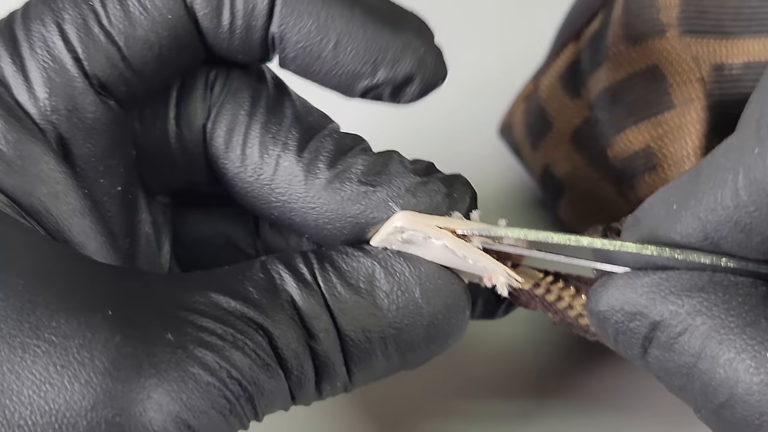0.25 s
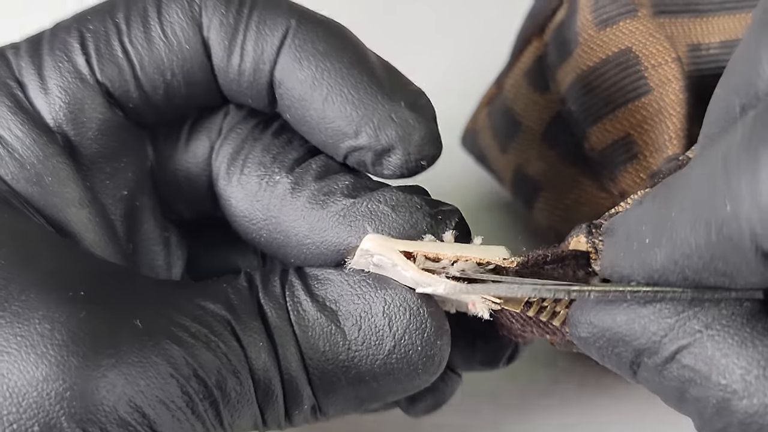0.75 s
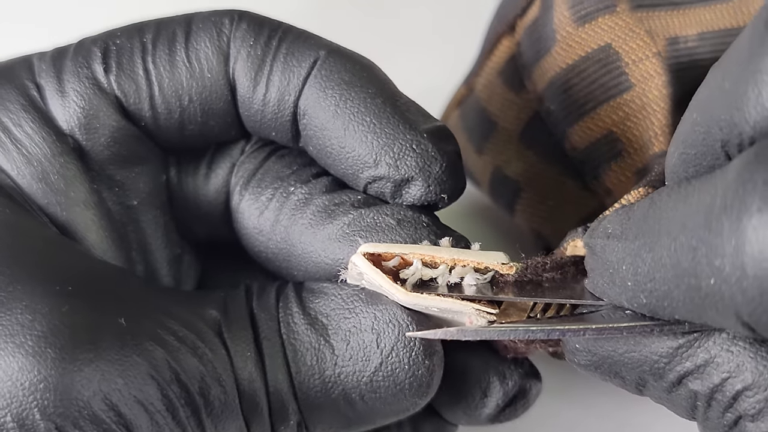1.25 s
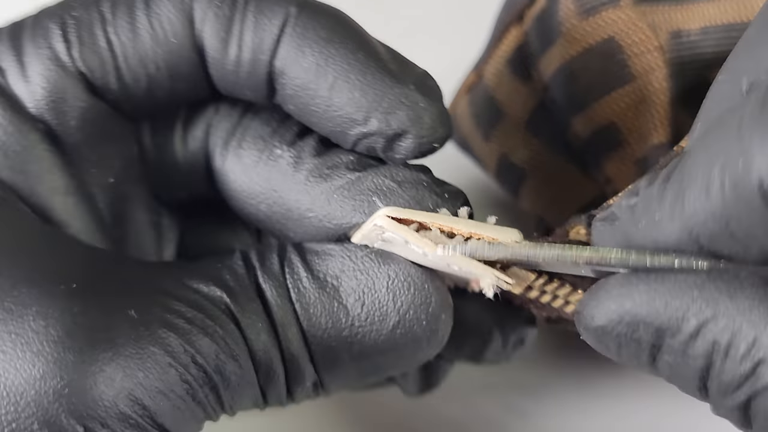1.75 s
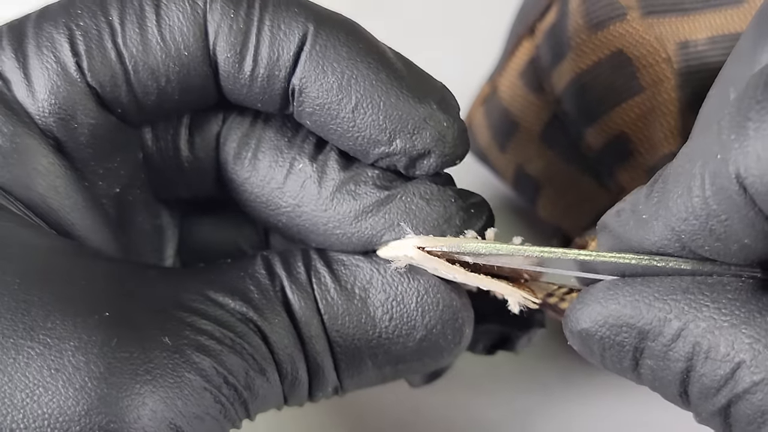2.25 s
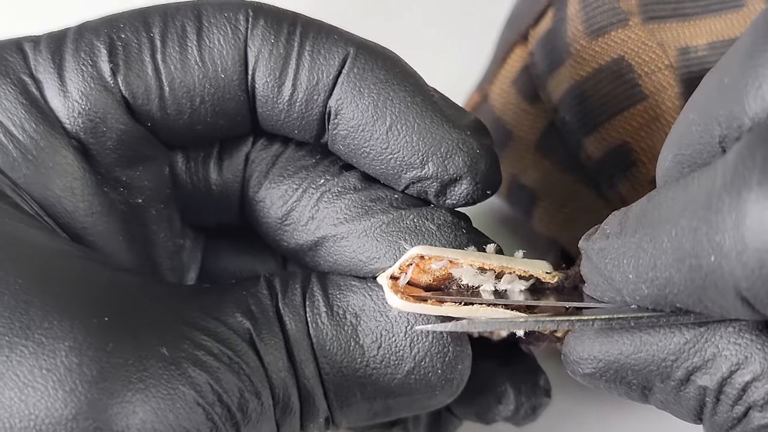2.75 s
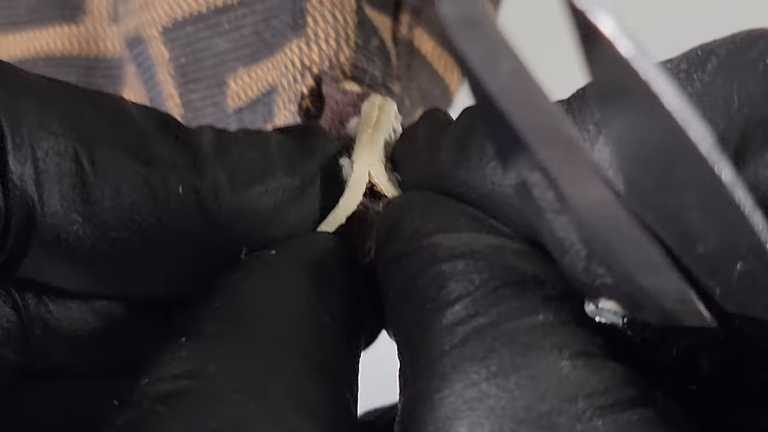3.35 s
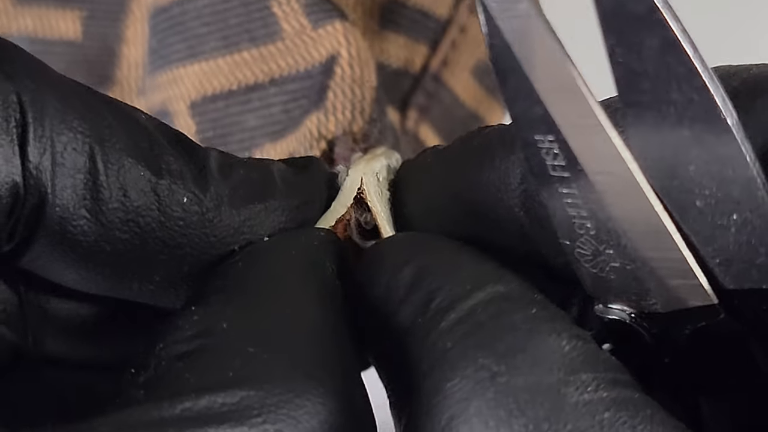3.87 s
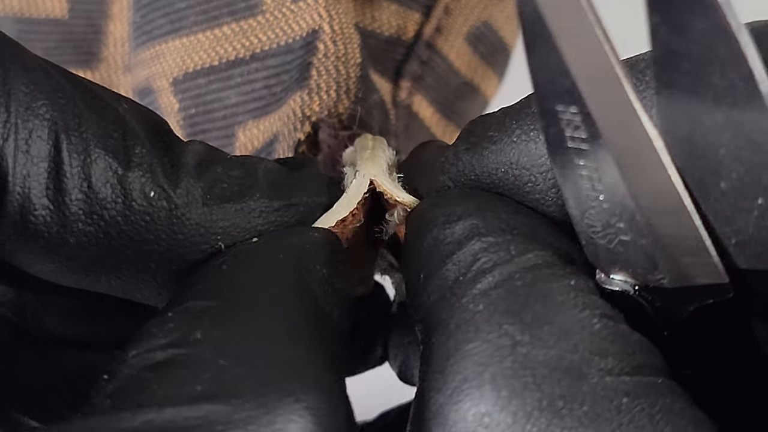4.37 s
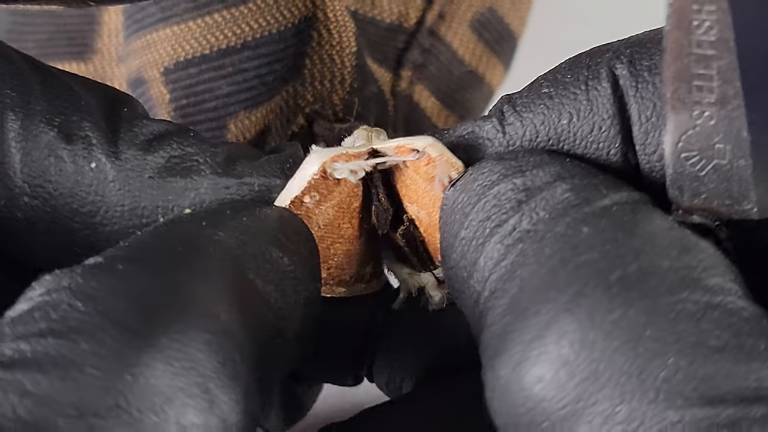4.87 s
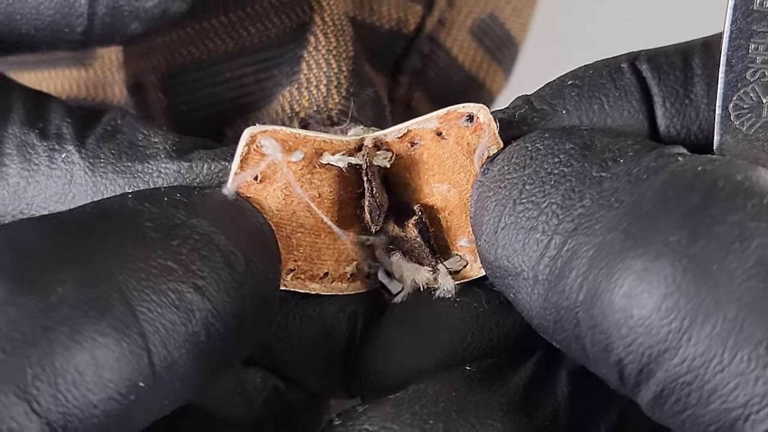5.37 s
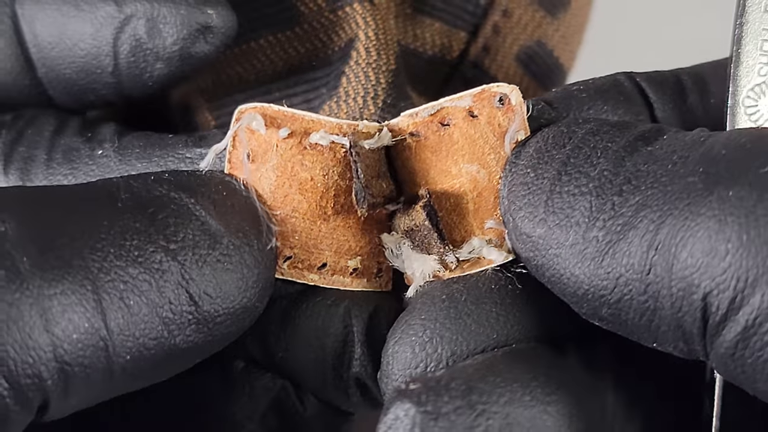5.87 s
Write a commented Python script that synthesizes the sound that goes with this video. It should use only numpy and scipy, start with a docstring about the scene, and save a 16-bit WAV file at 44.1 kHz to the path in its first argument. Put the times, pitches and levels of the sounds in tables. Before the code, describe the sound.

Delicate cutting of thread in leather: tiny dry ticks, short steel rasps and soft glove brushing, with snaps growing harder near the middle. Afterwards rubber fingertips drag and tap, a stiff piece pops open, and torn fibres crackle in quick clusters. A squeaky-gritty glove slide ends in a big low bump, followed by low shaking. Recorded very close, with a short room tail and quiet ventilation rumble.

```python
"""Small scissors cut the stitching of a leather tab, close to a two-port microphone: each snap is a
sharp release that rings damped steel and leather, between rasps of grainy filtered slips.
Gloved hands brush, rub and tap in shaped noise and short knocks; as the tab opens it pops, then its
fibres snap, crackle and strain. Bumps ring the microphone's holder in decaying sines; a hand jolts it late on.
Rumble, hiss and a faint hum lie behind; cuts and friction leave a short diffuse room tail."""
import sys
import numpy as np
from scipy import signal
from scipy.fft import rfft, irfft
from scipy.io import wavfile

SR = 44100
rng = np.random.default_rng(int(sys.argv[2]) if len(sys.argv) > 2 else 0)


def materialize(psi):
    """Save the field psi as 16-bit PCM at rate SR to the path in sys.argv[1].

    A 1-D psi becomes a single channel; in a 2-D psi each row is a channel.
    """
    bounded = np.clip(np.atleast_2d(psi).T, -1, 1)
    quanta = np.round(bounded * 32767).astype(np.int16)
    wavfile.write(sys.argv[1], SR, quanta)


N = 269871

# All levels in dB are relative: most layers add a trim of their own.
# Difference between the ports; the right one faces the blades.
# Each row: frequency in Hz, left over right in dB.
PORT_BALANCE = [(300, -8.5), (2800, -7.5), (5000, -5), (6500, -3), (8300, -17.5), (10000, -19.5),
                (12500, -3.5), (14500, -1)]

# Spectrum of the air noise. Each row: frequency in Hz, density in dB per Hz.
AIR_SPECTRUM = [(15, -73), (25, -24), (64, -11), (123, -9.5), (149, -12.5), (185, -11.5), (212, -27),
                (255, -13.5), (390, -35.5), (460, -28), (560, -35), (1040, -34.5), (1400, -40.5),
                (3620, -43), (16000, -55.5)]
# Likeness of the air noise in the two ports. Each row: frequency in Hz, likeness from -1 to 1.
AIR_LIKENESS = [(50, 1), (130, 1), (400, 0.65), (1500, 0.424), (5000, 0.034)]
# Steady hum tones. Each row: frequency in Hz, level in dB.
HUM_TONES = [(80.7, -59.5), (118.4, -57.5), (177.6, -60)]
# The background dips briefly. Each row: time in seconds, level in dB.
BACKGROUND_DIP = [(2.36, -10.5), (2.45, -26.5), (2.52, -33.5), (2.66, -25), (2.75, -11)]

# Soft brushing of gloves, leather and cloth, and one light blade scrape at 1.26 seconds.
# Each row: peak in seconds, level in dB, rise in seconds, fade in seconds, left over right in dB.
BRUSH_STROKES = [(0.008, -73, 0.078, 0.108, 1.5), (0.3, -82.5, 0.142, 0.283, 2),
                 (1.264, -77.5, 0.035, 0.091, -2.5), (1.78, -78, 0.144, 0.15, -3.5),
                 (1.868, -78, 0.058, 0.093, -5.5), (3.118, -77, 0.149, 0.31, 0),
                 (3.49, -84, 0.42, 0.22, 2.5), (3.607, -72, 0.069, 0.101, 1.5), (3.8, -78, 0.19, 0.138, -2),
                 (5.2, -84.5, 1, 0.93, 2), (6.081, -80, 0.5, 0.215, 4)]
# Soft and hard-pressed brushing spectra. Each row: frequency in Hz, density in dB per Hz.
SOFT_BRUSH_SPECTRUM = [(900, 3.5), (2000, 1), (2700, -3), (4000, 0), (5200, 1), (7000, -6), (10000, -39),
                       (15000, -12.5)]
HARD_BRUSH_SPECTRUM = [(2000, -40.5), (4500, -24), (6300, -1), (8500, 0.5), (11000, -2.5), (15000, -41.5)]

# Firmness of the grip, light while cutting and firm while pulling the tab open.
# Each row: time in seconds, level in dB.
GRIP_FIRMNESS = [(0, -58), (0.8, -59), (1.9, -55.5), (2.9, -61.5), (3.5, -53.5), (4.2, -56), (5.0, -48.5),
                 (6.12, -58)]
# Rubber fingertips dragging on the leather.
# Each row: peak in seconds, level in dB, rise in seconds, fade in seconds.
RUB_STROKES = [(1.85, -65.5, 0.081, 0.076), (2.1, -72.5, 0.25, 0.5), (3.15, -69.5, 0.195, 0.293),
               (3.54, -64.5, 0.134, 0.157), (3.88, -70.5, 0.35, 0.77), (4.1, -64, 0.151, 0.06),
               (4.24, -62, 0.234, 1), (4.46, -62, 0.108, 0.05), (4.76, -70, 0.118, 0.38),
               (5.965, -64, 0.068, 0.067), (6.035, -62.5, 0.039, 0.26)]
# A glove sliding over the opened tab, close to the microphone.
# Each row: peak in seconds, level in dB, rise in seconds, fade in seconds.
SLIDE_STROKES = [(5.56, -62, 0.135, 0.192), (5.73, -57.5, 0.093, 0.146), (5.816, -54.5, 0.0125, 0.0797),
                 (5.848, -58, 0.061, 0.0434)]
# Spectra of the grip, the rub, and the slide at each port.
# Each row: frequency in Hz, density in dB per Hz.
GRIP_SPECTRUM = [(20, -16.5), (45, -6), (70, 5), (120, -2), (200, -9.5), (350, -22), (700, -53.5),
                 (3000, -54.5)]
RUB_SPECTRUM = [(120, 0), (310, 8), (490, 2.5), (800, -5), (1000, -5), (1170, -7.5), (1400, -6.5),
                (1800, -15), (3600, -22), (4400, -25), (14000, -45)]
LEFT_SLIDE_SPECTRUM = [(200, 11.5), (1000, -3), (1800, -1), (2150, -12.5), (2550, -13), (3600, -7.5),
                       (4300, -20), (5200, -14.5), (8000, -28), (11000, -29), (16000, -27.5)]
RIGHT_SLIDE_SPECTRUM = [(250, 14), (1000, -6), (1170, -8), (1400, -5), (2550, -19), (3000, -7.5),
                        (4400, -18), (11000, -22.5), (16000, -31.5)]

# Hand knocks that reach the microphone. Each row: start in seconds, level in dB.
HAND_BUMPS = [(0.234, -48.5), (2.536, -59), (3.094, -41.5), (3.212, -48), (3.373, -50.5), (3.454, -44),
              (3.783, -47), (4.334, -41.5), (4.573, -39), (4.746, -43), (4.834, -40.5), (4.922, -44.5),
              (5.047, -39.5), (5.087, -43.5), (5.203, -43), (5.301, -42.5), (5.815, -25), (6.024, -38.5)]
# Modes of the microphone's holder.
# Each row: frequency in Hz, level in dB, swelling time in seconds, right port as a factor on the left.
HOLDER_MODES = [(62.96, -6.5, 0.00856, -1.95), (127.36, 0, 0.00515, -0.028), (180.9, -7.5, 0.00516, -0.5),
                (236.3, -15.5, 0.00567, 0.5), (476.3, -33.5, 0.0062, -0.38)]

# Strokes of the blade along the seam.
# Each row: peak in seconds, level in dB, rise in seconds, fade in seconds.
SCRAPE_STROKES = [(0.73, -77.5, 0.073, 0.35), (0.875, -66.5, 0.0636, 0.087), (0.97, -78.5, 0.057, 0.45),
                  (1.862, -64, 0.05, 0.067), (2.062, -72, 0.029, 0.118), (2.207, -69.5, 0.011, 0.031),
                  (3.1, -70, 0.069, 0.031), (3.147, -72.5, 0.018, .015), (3.212, -75.5, 0.025, 0.051),
                  (3.622, -68.5, 0.029, 0.044), (4.47, -68.5, 0.05, 0.0615)]
# Scrape spectrum. Each row: frequency in Hz, density in dB per Hz.
SCRAPE_SPECTRUM = [(1500, -25.5), (2800, 1.5), (4500, -2), (6000, 1.5), (7200, 0.5), (9000, -7),
                   (11000, -4.5), (12200, -25.5), (16000, -11.5)]

# One row a snap: cut threads at first, sharp fibre crackles once the tab tears.
# Each row: start in seconds, sharp snap in dB, bright ring in dB, bright ring in Hz,
# dull crunch in dB, lowest leather ring in Hz.
SNAP_EVENTS = [(0.7044, -55, -71, 9000, -88.5, 2520), (0.7674, -60, -59.5, 6930, -89, 2500),
               (0.8617, -53, -41, 9200, -64, 2900), (0.867, -64, -41, 9100, -61.5, 2940),
               (1.2535, -54, -41.5, 5290, -57.5, 2340), (1.257, -57.5, -53.5, 6800, -63, 1780),
               (1.6624, -56, -67.5, 10100, -67, 1460), (1.8327, -49, -46, 5070, -63, 2500),
               (2.5364, -33.5, -37.5, 10220, -50.5, 2370), (3.1062, -36.5, -30, 8570, -39.5, 2570),
               (4.0503, -61, -50, 6220, -91.5, 2500), (4.432, -52, -45, 8210, -67.5, 2500),
               (4.565, -24, -21, 9785, -55.5, 2440), (4.7846, -45.5, -49.5, 9700, -67, 2080),
               (4.829, -46, -44.5, 11100, -72, 2000), (4.916, -49, -52, 9400, -82, 2005),
               (4.9477, -52.5, -46, 9500, -81, 2000), (4.998, -47.5, -47, 9200, -80.5, 2000),
               (5.039, -38.5, -37.5, 9970, -81.5, 2000), (5.0517, -48.5, -44.5, 7600, -83.5, 2000),
               (5.3027, -41, -43, 11200, -81, 2000), (5.622, -65.5, -66.5, 12800, -86, 2000),
               (5.6946, -48, -59.5, 12300, -80.5, 2000), (5.8061, -39, -52, 13000, -71.5, 2000),
               (5.985, -53, -61.5, 11600, -79, 2000)]
# The stiff leather's rings. Each row: multiple of its lowest, width in Hz, level in dB.
LEATHER_RINGS = [(1, 640, -2), (1.18, 800, 0), (1.35, 647, -6)]
# Spectra of the sharp snap and dull crunch. Each row: frequency in Hz, density in dB per Hz.
SNAP_SPECTRUM = [(300, 4.5), (1300, -5.5), (3000, -16), (5200, -0.5), (6300, 2.5), (7400, -6), (9800, 1.5),
                 (11000, 8), (12500, 3), (15500, -1)]
CRUNCH_SPECTRUM = [(150, 0.5), (480, -9.5), (740, 14.5), (1200, -23.5), (1700, 4.5), (2050, -32),
                   (2450, 9.5), (3350, 4.5), (3900, -16), (5300, -11.5), (8000, -23), (15000, -60.5)]

# The pressed blade, and later the stretched glove, sing in a narrow, sliding band.
# Each row: peak in seconds, level in dB, rise in seconds, fade in seconds, frequency at the peak in Hz,
# glide in octaves per second, left over right in dB.
RASP_STROKES = [(0.955, -76, 0.117, 0.117, 8070, 1.5, -15), (1.78, -75.5, 0.096, .18, 5170, 3.5, 1.5),
                (1.872, -69, 0.056, 0.071, 6230, -2, 5), (3.085, -76.5, 0.067, 0.058, 5650, 6.5, -3.5),
                (3.208, -75.5, 0.039, 0.035, 8700, 0, -11.5), (3.48, -77.5, 0.085, 0.31, 3750, 7.5, 8),
                (3.577, -65, 0.081, 0.049, 4320, 0, 4.5), (3.612, -65, 0.053, 0.04, 5560, 8, 13),
                (5.655, -76, 0.063, .1, 13860, 0.94, 2), (5.72, -72.5, 0.048, 0.3, 11150, 0.13, -0.5)]

# Soft taps of glove and scissors on the leather. Each row: start in seconds, pat in dB,
# hollow knock in dB, knock in Hz, port angle in degrees (0 left, 90 right, 135 opposed).
LEATHER_TAPS = [(1.253, -54, -50, 612, 56.5), (1.971, -48.5, -57, 600, 67), (3.104, -49.5, -51, 830, 84),
                (3.122, -56, -42.5, 271, 62), (4.108, -59, -31.5, 209.3, 107.5),
                (4.176, -61.5, -33.5, 158.6, 107.3), (4.203, -49, -40, 235, 48),
                (4.221, -49.5, -35.5, 376, 117), (4.289, -59.5, -39, 499, 98),
                (4.304, -46, -32.5, 510, 139.5), (4.442, -52, -38, 283, 92.5),
                (4.481, -39.5, -38, 372, 104), (4.566, -52, -26, 148, 121.3),
                (4.956, -52.5, -36, 237.4, 24.4), (5.27, -53.5, -39.5, 197, 42),
                (5.517, -43, -41.5, 291, 86), (5.812, -31.5, -17.5, 141, 156.4),
                (5.978, -47, -29, 164.6, 5.1), (6.017, -44, -31.5, 219, 104.8),
                (6.049, -43, -41, 293, 14.8)]
# Pat spectrum. Each row: frequency in Hz, density in dB per Hz.
PAT_SPECTRUM = [(100, 6), (300, 13), (450, 1.5), (680, -2), (950, -6), (1400, -12.5), (2200, -22),
                (3300, -38.5), (6000, -29.5), (12000, -39)]

# Spectrum of the tab's pop. Each row: frequency in Hz, density in dB per Hz.
POP_SPECTRUM = [(300, -31), (800, -6), (1250, 2.5), (1650, -6), (2300, -41.5), (8000, -17.5)]

# Pulls that tear fibres as the tab opens.
# Each row: peak in seconds, level in dB, rise in seconds, fade in seconds.
TEAR_STROKES = [(4.786, -51.5, 0.0063, 0.016), (4.806, -60, 0.046, 0.0574), (4.832, -51, 0.026, 0.0452),
                (4.948, -56.5, 0.048, .045), (5.033, -62.5, 0.074, 0.089), (5.17, -78.5, 0.23, 0.52),
                (5.425, -76, 0.066, 0.45), (5.712, -67, 0.096, 0.126), (5.817, -74.5, 0.022, 0.045)]
# Tearing spectrum. Each row: frequency in Hz, density in dB per Hz.
TEAR_SPECTRUM = [(2000, -32), (4200, -29.5), (5000, -2.5), (5700, -25), (6400, -15), (7200, -12),
                 (8300, -4.5), (9500, -1.5), (10400, -5), (12700, -6), (13800, -11), (15500, -18)]

# Fibres creep with each small tug while the tab is held taut.
# Each row: peak in seconds, level in dB, rise in seconds, fade in seconds.
STRAIN_STROKES = [(5.07, -75.5, 0.155, 0.145), (5.205, -77, 0.1, 0.176), (5.5, -80.5, 0.335, 0.32)]
# Bands that the creeping fibres ring. Each row: frequency in Hz, width in Hz, level in dB.
STRAIN_RINGS = [(5106, 550, 0), (6380, 940, 1), (9500, 600, -3.5)]

# A hand jolts the microphone. The one row: start in seconds, length in seconds, level in dB,
# frequency in Hz, right port as a factor on the left.
HAND_JOLT = (6, 0.47, -22.5, 63, -1.54)

# Spectrum of the room tail. Each row: frequency in Hz, density in dB per Hz.
ROOM_SPECTRUM = [(200, -10), (700, 6), (1500, 0), (3000, 0), (6000, 1.5), (10000, -1), (13000, -7),
                 (16000, -20)]


def gain_of(db):
    """Decibels to amplitude."""
    return 10 ** (np.asarray(db) / 20)


def port_gains(left_over_right_db):
    """Left and right gains that share a level difference equally."""
    return gain_of(np.array([[.5], [-.5]]) * left_over_right_db)


def evened(x):
    """Scales to rms 1."""
    return x / np.sqrt(np.mean(x ** 2) + 1e-20)


def read(points, hz):
    """Reads a spectrum on a log-frequency axis."""
    f, value = np.transpose(points)
    return np.interp(np.log(hz + 1), np.log(f + 1), value)


def level(points):
    """Amplitude over time from a curve of (seconds, dB)."""
    return gain_of(np.interp(np.arange(N) / SR, *np.transpose(points)))


def add(mix, s, sound):
    """Mixes a sound in at time s."""
    part = mix[..., max(round(s * SR), 0):][..., :sound.shape[-1]]
    part += sound[..., :part.shape[-1]]


def colour(x, spectrum, facing=0, size=4096):
    """Minimum-phase filter to both ports, mean energy 1; facing scales the port balance."""
    hz = np.fft.rfftfreq(size, 1 / SR)
    log_gain = np.log(gain_of(read(spectrum, hz)) * port_gains(facing * read(PORT_BALANCE, hz)))
    circle = np.concatenate([log_gain, log_gain[:, -2:0:-1]], axis=1)
    # the Hilbert transform of the log gain gives the phase that makes the filter causal
    impulse = np.fft.ifft(np.exp(np.conj(signal.hilbert(circle)))).real
    return signal.oaconvolve(x * np.ones((2, 1)), evened(impulse) / np.sqrt(size), axes=1)[:, :N]


def pair(x, same):
    """Blends two unrelated signals to a given likeness; negative = the ports move against each other."""
    same = np.clip(same, -1, 1)
    return np.array([x[0], same * x[0] + np.sqrt(1 - same ** 2) * x[1]])


def flutter(per_s, depth_db):
    """Random unsteadiness: a gain that wanders between random knots, per_s of them a second."""
    knots = rng.standard_normal(N)
    return gain_of(depth_db * np.interp(np.arange(N) / SR * per_s, np.arange(N), knots))


def slips(per_s, spread_db, smooth):
    """Tiny stick-slip releases of uneven size, shared by both ports, over a fine hiss."""
    sizes = gain_of(spread_db * np.minimum(rng.exponential(1, N), 4))
    signed = sizes * rng.choice([-1, 1], N)
    releases = evened(signed * (rng.random(N) < per_s / SR))
    return evened(releases + smooth * rng.standard_normal((2, N)))


def stroke(peak_s, db, rise_s, fade_s):
    """Amplitude of one stroke: the pressure builds to its peak and is let go evenly in dB."""
    drop_db, rise_curve = 19, 1.319  # the drop is reached one rise before or one fade after the peak
    t = np.arange(N) / SR - peak_s
    away = np.maximum(-t / rise_s, 0) ** rise_curve + np.maximum(t / fade_s, 0)
    return gain_of(db - drop_db * np.minimum(away, 10))


def strokes(rows):
    """Amplitude of a run of strokes; where they overlap their powers add."""
    return np.sqrt(sum(stroke(*row) ** 2 for row in rows))


def ringing(hz, width_hz, size=700):
    """A heavily damped ring of energy 1: the fingers stop it within a few cycles."""
    t = np.arange(size) / SR
    return evened(t * np.sin(2 * np.pi * hz * t) * np.exp(-np.pi * width_hz * t)) / np.sqrt(size)


def resonate(x, hz, width_hz):
    """A resonance of gain 1 that follows a moving frequency."""
    turn = np.exp(2j * np.pi * np.cumsum(hz) / SR)
    r = np.exp(-np.pi * width_hz / SR)
    # shift the band down to 0 Hz, smooth it there, and shift it back
    return 2 * (turn * signal.lfilter([1 - r], [1, -r], x / turn)).real


def background():
    """Ventilation rumble and faint hiss from filtered noise, with a wavering hum of sines."""
    t = np.arange(N) / SR
    spectra = rfft(rng.standard_normal((2, N)))
    noise = irfft(pair(spectra, read(AIR_LIKENESS, np.fft.rfftfreq(N, 1 / SR))), N)
    air = gain_of(-53.5) * colour(noise, AIR_SPECTRUM, facing=0.064)
    hum = 0
    for hz, db in HUM_TONES:
        tone = np.sin(2 * np.pi * (hz * t + rng.random()))
        hum = hum + gain_of(db) * tone * flutter(per_s=6, depth_db=1.5)
    return (air + gain_of(7.5) * hum) * level(BACKGROUND_DIP)


def brushing(hard_db=-68):
    """Soft swishes and one light blade scrape, wandering between the ports and brighter when pressed."""
    powers = np.array([stroke(*row[:-1]) ** 2 for row in BRUSH_STROKES])
    pan_db = np.transpose(BRUSH_STROKES)[-1] @ powers / powers.sum(0)
    press = np.sqrt(powers.sum(0))
    swish = rng.standard_normal((2, N)) * flutter(per_s=280, depth_db=4.0)
    soft = colour(swish * press, SOFT_BRUSH_SPECTRUM)
    grit = slips(per_s=1000, spread_db=3, smooth=1.1)
    hard = colour(grit * press ** 2 / gain_of(hard_db), HARD_BRUSH_SPECTRUM)
    return gain_of(6.5) * port_gains(pan_db) * (soft + hard)


def judder(same):
    """Rubber sticks and slips in uneven runs, shaking each port in its own way."""
    ports = np.array([slips(per_s=600, spread_db=3.2, smooth=.65)[0] for port in range(2)])
    return pair(ports, same) * flutter(per_s=70, depth_db=1.2)


def gloves():
    """Fingertips rub and slide on the leather, and the grip shakes the two ports somewhat in opposition."""
    rubbing, sliding = strokes(RUB_STROKES), strokes(SLIDE_STROKES)
    rub = gain_of(2.5) * colour(judder(same=0.00081) * rubbing, RUB_SPECTRUM, facing=0.21)
    drag = judder(same=-0.157) * sliding
    slide_left = gain_of(9.5) * colour(drag, LEFT_SLIDE_SPECTRUM)[0]
    slide_right = gain_of(12.0) * colour(drag, RIGHT_SLIDE_SPECTRUM)[1]
    slide = np.array([slide_left, slide_right])
    # a moving finger shakes the grip too
    finger_shake = gain_of(16) * rubbing + gain_of(14.5) * sliding
    shake = np.hypot(level(GRIP_FIRMNESS), finger_shake)
    dip = level(BACKGROUND_DIP) / level(BACKGROUND_DIP).max()
    tremor = pair(rng.standard_normal((2, N)), same=-0.15) * flutter(per_s=35, depth_db=4.0)
    grip = colour(tremor * shake * dip, GRIP_SPECTRUM, facing=0.466)
    return rub + slide + grip


def bumps(size=6000):
    """Each knock rocks the microphone's holder for a few cycles."""
    t, out, ring = np.arange(size) / SR, np.zeros((2, N)), np.zeros((2, size))
    for hz, db, swell_s, right in HOLDER_MODES:
        envelope = t / swell_s * np.exp(1 - t / swell_s)
        ring += gain_of(db) * envelope * np.sin(2 * np.pi * hz * t) * np.array([[1], [right]])
    for s, db in HAND_BUMPS:
        add(out, s, gain_of(db) * ring)
    return gain_of(7.5) * out


def blade():
    """The steel edge rasps over thread and leather, catching on single fibres."""
    rasp = slips(per_s=350, spread_db=3.6, smooth=1.3)
    return colour(rasp * strokes(SCRAPE_STROKES), SCRAPE_SPECTRUM, facing=0.89)


def snaps(size=700):
    """Cut threads, later torn fibres, let go in a sharp release that rings and crumbles away."""
    snap_db, ring_db, crunch_db, leather_db = -18, -19, -13, -14  # layer trims
    bright_damping = 0.347  # ring width as a share of its frequency
    crumbling, crumble_s = 0.0855, 0.00206  # amount, decay
    snap, ring, crunch = np.zeros((3, 2, N))
    t = np.arange(size) / SR
    release_s = t[55]  # a short faint crumbling comes before the release
    crumble = np.where(t < release_s, .2, np.exp(-abs(t - release_s) / crumble_s))
    for s, sharp_db, bright_db, bright_hz, dull_db, leather_hz in SNAP_EVENTS:
        fibres = crumble * pair(rng.standard_normal((2, size)), same=0.66)
        release = evened((t == release_s) + crumbling * fibres)
        add(snap, s, gain_of(sharp_db + snap_db) * release)
        add(crunch, s, gain_of(dull_db + crunch_db) * release)
        rings = [(bright_db + ring_db, bright_hz, bright_damping * bright_hz)]
        for multiple, width_hz, db in LEATHER_RINGS:
            rings.append((dull_db + leather_db + db, leather_hz * multiple, width_hz))
        for db, hz, width_hz in rings:
            sides = evened(port_gains(read(PORT_BALANCE, hz)))
            rung = signal.fftconvolve(release, ringing(hz, width_hz)[None])
            add(ring, s, gain_of(db) * sides * rung)
    return colour(snap, SNAP_SPECTRUM, facing=1.0) + ring + colour(crunch, CRUNCH_SPECTRUM, facing=1.0)


def rasping(width_hz=2000):
    """Gritty slips ring the contact; the pitch slides as the point of contact travels."""
    t = np.arange(N) / SR
    powers = np.array([stroke(*row[:4]) ** 2 for row in RASP_STROKES])
    share = powers / powers.sum(0)  # the strongest stroke dominates pitch and place
    hz = np.zeros(N)
    for part, (s, *_, peak_hz, glide, pan_db) in zip(share, RASP_STROKES):
        hz += part * peak_hz * 2 ** np.clip(glide * (t - s), -.5, .5)
    sides = port_gains(np.transpose(RASP_STROKES)[-1] @ share)
    grit = slips(per_s=700, spread_db=3, smooth=.8)
    song = evened(resonate(resonate(grit, hz, width_hz), hz, width_hz))
    return sides * np.sqrt(powers.sum(0)) * song


def taps(decay_s=0.0118, swell_cycles=0.534, size=1500):
    """Short dull pats; the hollow between the fingers knocks for a few cycles."""
    t, pats, knocks = np.arange(size) / SR, np.zeros((2, N)), np.zeros((2, N))
    for s, pat_db, knock_db, hz, angle in LEATHER_TAPS:
        burst = rng.standard_normal((2, size)) * np.exp(-t / decay_s)
        add(pats, s, gain_of(pat_db) * evened(burst + 9 * (t == 0)))  # a click leads the burst
        age, turn = t * hz / swell_cycles, np.radians(angle)
        knock = age * np.exp(1 - age) * np.sin(2 * np.pi * hz * t)
        add(knocks, s, gain_of(knock_db) * knock * np.array([[np.cos(turn)], [np.sin(turn)]]))
    return gain_of(-11.0) * colour(pats, PAT_SPECTRUM, facing=0.7) + knocks


def pop(at_s=4.565, decay_s=0.0019, size=1200):
    """The stiff tab flexes with one short hollow knock as its last stitch gives."""
    t, out = np.arange(size) / SR, np.zeros((2, N))
    burst = rng.standard_normal((2, size)) * np.exp(-t / decay_s)
    add(out, at_s, evened(burst + 14 * (t == 0)))  # a click leads the burst
    return gain_of(-52) * colour(out, POP_SPECTRUM, facing=1.0)


def tearing():
    """Glued fibres let go in clumps of crackles."""
    crackle = slips(per_s=1300, spread_db=4.5, smooth=.3) * flutter(per_s=300, depth_db=2)
    return gain_of(-0.5) * colour(crackle * strokes(TEAR_STROKES), TEAR_SPECTRUM, facing=1.0)


def straining(wander_db=1.5):
    """Taut fibres creep in faint ticks that ring three narrow bands, stronger at the right port."""
    creep = slips(per_s=260, spread_db=4, smooth=.6)
    ticks = np.zeros((2, N))
    for hz, width_hz, db in STRAIN_RINGS:
        steady_hz = np.full(N, hz)
        band = evened(resonate(resonate(creep, steady_hz, width_hz), steady_hz, width_hz))
        sides = gain_of(db) * port_gains(read(PORT_BALANCE, hz))
        ticks += sides * flutter(per_s=25, depth_db=wander_db) * band
    return gain_of(-3.5) * ticks * strokes(STRAIN_STROKES)


def jolt():
    """A deep shudder that lasts only while the hand touches the microphone."""
    s, length_s, db, hz, right = HAND_JOLT
    t, out = np.arange(0, length_s, 1 / SR), np.zeros((2, N))
    shudder = np.sin(np.pi * t / length_s) ** .5 * np.sin(2 * np.pi * hz * t)
    add(out, s, gain_of(db) * shudder * np.array([[1], [right]]))
    return out


def room(x, t60_s=0.179, size=16384):
    """A diffuse tail: each sound's energy lingers briefly as dense, unrelated reflections."""
    lingering = gain_of(-120 * np.arange(size) / SR / t60_s)  # a power, so 60 dB down at t60_s
    power = signal.oaconvolve((x ** 2).mean(0), lingering / lingering.sum())[:N]
    return colour(rng.standard_normal((2, N)) * np.sqrt(abs(power)), ROOM_SPECTRUM)


def scene():
    """Close work sounds with a little room, over the background."""
    releases = snaps() + pop()
    friction = blade() + rasping() + tearing() + straining() + brushing()
    tails = gain_of(-14.5) * room(releases) + gain_of(-15.5) * room(friction)
    handling = taps() + gloves() + bumps() + jolt()
    return releases + friction + tails + handling + background()


def record(dry, edge_hz=16100):
    """Band limit: a steep low-pass removes the top of the treble."""
    low_pass = signal.firwin(511, edge_hz, window=("kaiser", 9), fs=SR)
    return signal.oaconvolve(dry, low_pass[None], "same")


dry = scene()
out = record(dry)
materialize(out)
```